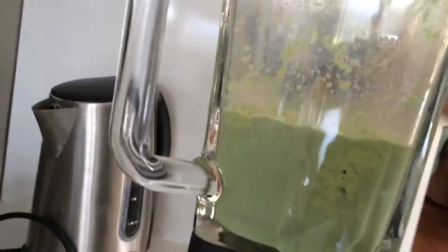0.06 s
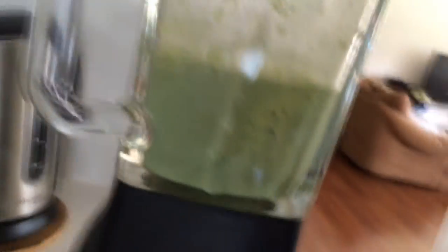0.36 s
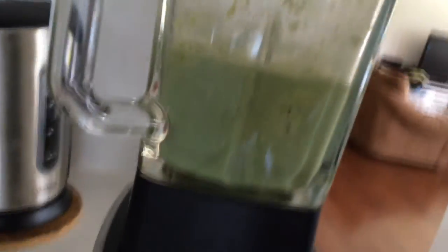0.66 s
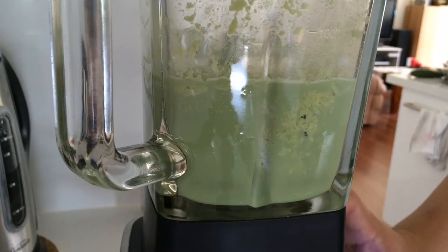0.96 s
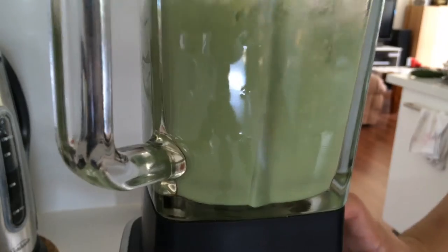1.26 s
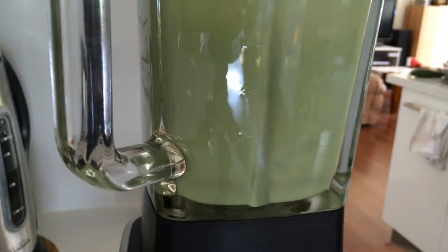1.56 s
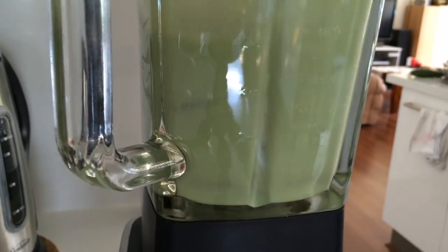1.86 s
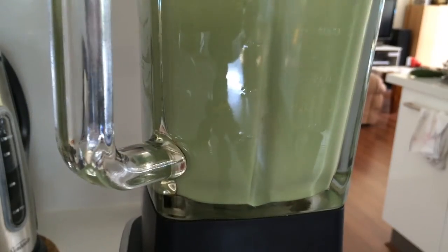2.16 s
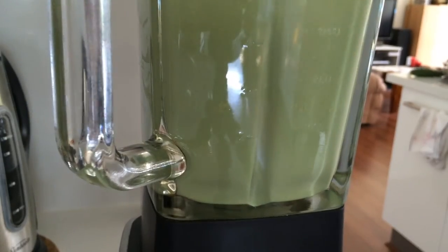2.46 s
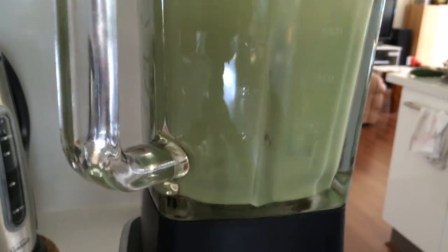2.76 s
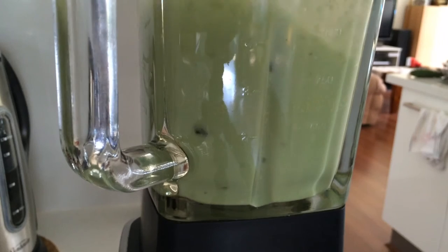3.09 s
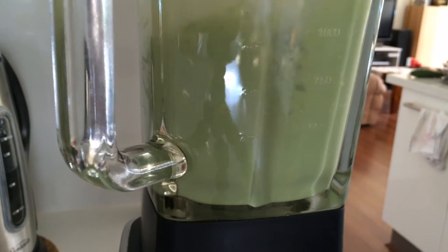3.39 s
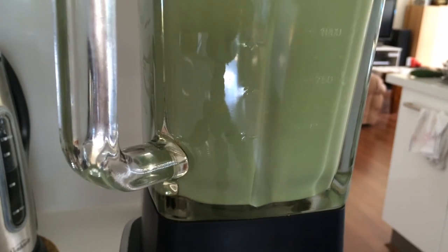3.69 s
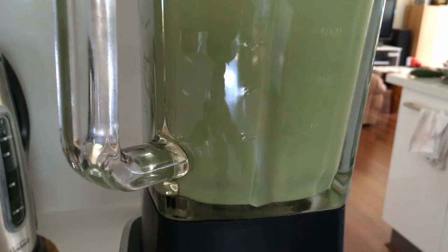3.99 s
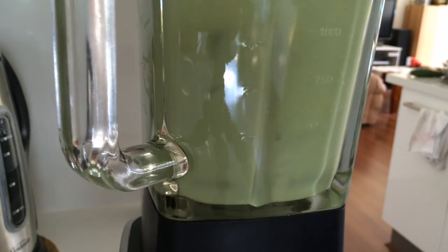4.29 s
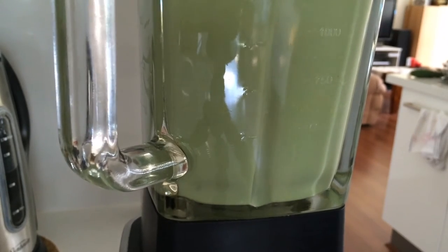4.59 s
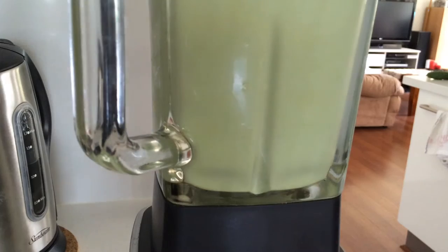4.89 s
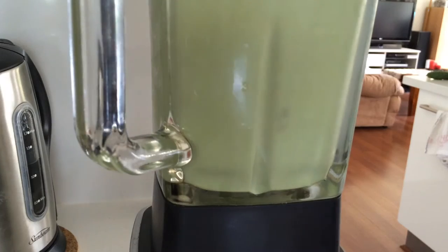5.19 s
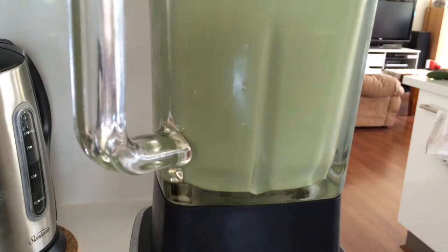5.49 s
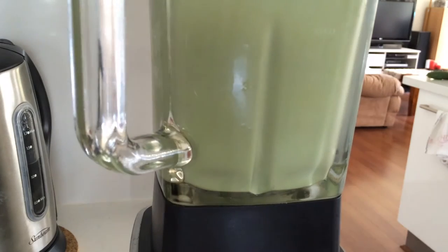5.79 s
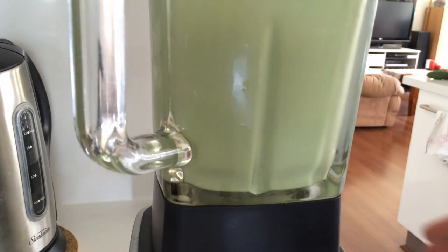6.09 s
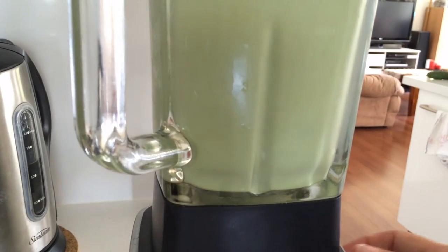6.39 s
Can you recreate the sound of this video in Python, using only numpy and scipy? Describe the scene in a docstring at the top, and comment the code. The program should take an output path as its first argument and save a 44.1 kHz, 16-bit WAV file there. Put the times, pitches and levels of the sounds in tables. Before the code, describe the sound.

After a few soft knocks, a glass blender grinds ice twice, winding down between, then whirs smoothly through the drink.

```python
"""Ice smoothie in a glass blender

Close up in a kitchen: a few handling knocks, the snap of a switch, then two bursts of crushing.
Blades shatter ice against the ringing jar and the base thuds on the counter. The motor's pitch dips
as it crushes and winds down at the end of each burst; the drink slops back between the two. At last
the motor spins freely: a shaft hum, an eight-bladed fan's whine and a rush of air and liquid."""
import sys
import numpy as np
from scipy import signal
from scipy.fft import rfft, irfft, next_fast_len
from scipy.io import wavfile
from scipy.ndimage import uniform_filter1d

SR = 44100
rng = np.random.default_rng(int(sys.argv[2]) if len(sys.argv) > 2 else 0)


def materialize(psi):
    """Save the field psi as 16-bit PCM at rate SR to the path in sys.argv[1].

    A 1-D psi becomes a single channel; in a 2-D psi each row is a channel.
    """
    bounded = np.clip(np.atleast_2d(psi).T, -1, 1)
    quanta = np.round(bounded * 32767).astype(np.int16)
    wavfile.write(sys.argv[1], SR, quanta)


N = 284356
TIME = np.arange(N) / SR
FFT_SIZE = 2 * next_fast_len(N * 3 // 5)
FREQ = np.maximum(np.arange(FFT_SIZE // 2 + 1) * SR / FFT_SIZE, 1)
FAN_BLADES = 8
THUD_LOAD_DB = 12.5  # the base thuds this much harder at full load

# The two bursts of crushing. Each row: start, run-down start and end in seconds, fade in dB per second.
BURSTS = [(1.197, 2.63, 3.36, 80), (3.386, 4.39, 4.781, 20)]
# Resonances of the filled jar and motor base. Each row: frequency in Hz, width in Hz, lift in dB.
JAR_MODES = [(1207, 89, 3), (1560, 52, 4), (2095, 196, 3), (2900, 66, -1.5), (3680, 150, 4), (4053, 183, 5),
             (4397, 67, 5.5), (4760, 73, 5), (5440, 120, 4), (6240, 140, 3), (6850, 180, 3),
             (7180, 120, 4.5), (7720, 170, 1.5), (9550, 110, 4.5)]
# Tone curves. Each row: frequency in Hz, relative level in dB.
CRUNCH_EQ = [(100, -13), (250, -11), (420, 1), (750, -5), (1400, -0.5), (1850, 1), (2300, 3.5), (3200, 0),
             (4500, -1.5), (5600, -5.5), (8000, -9.5), (11000, -12.5), (15500, -24)]  # bright breaking ice
BOOM_EQ = [(400, -21.5), (760, -17), (900, -6), (1030, 3), (1180, -3), (1400, -6.5), (2000, -29)]  # hollow boom of the filled jar
THUD_EQ = [(20, -21), (45, -14), (85, -2), (130, 3), (180, -6.5), (300, -13.5), (700, -41.5), (2000, -72)]  # low thud of the base on the counter
CLACK_EQ = [(300, -9.5), (1100, -5), (1750, 8.5), (2000, 1), (2350, 9.5), (3000, -9.5), (4000, -10.5),
            (4800, -18.5), (15000, -35.5)]  # hard, dry clack


def crushing(speed, crunch_db, fade_db, load, boom_db=-2.0, thud_db=-17):
    """Blades sweep through clumps of ice: shards crackle, the jar booms, the base thuds."""
    tones, angle = burst_motor(speed, crunch_db, load)
    clumps = drift(30)
    sweep = 1 + 0.24 * np.cos(2 * angle)  # two blade tips pass each rib per turn
    shards = grains(per_s=8000, spread_db=2.5) * sweep * from_db(crunch_db + 2.0 * clumps)
    shoves = grains(per_s=1500, spread_db=2.0) * from_db(crunch_db + boom_db + 1.4 * clumps)
    thuds = grains(per_s=700, spread_db=1.0) * from_db(crunch_db + thud_db + THUD_LOAD_DB * load)
    running = sum(gate(start, end, fade=0.0016) for start, _, end, _ in BURSTS) * from_db(fade_db)
    glass = jar(shards, ring_db=-18.0) + rattle(shards, speed, rattle_db=-12.0)
    return (tones + glass + colour(shoves, BOOM_EQ) + colour(thuds, THUD_EQ)) * running


def ice_chunks(speed, load, jolt_db=-15.5):
    """Big pieces shatter in a spray of cracks, knock on the jar and jolt the base, harder under load."""
    # Chunks caught by the blades. Each row: start and chewing time in seconds, crack and boom in dB.
    chunks = [(1.254, 0.1, -15.5, -16), (1.652, 0.035, -21, -27), (1.846, 0.056, -18.5, -20.5),
              (2.004, 0.026, -26, -19.5), (2.081, 0.013, -18, -19.5), (2.115, 0.042, -26.5, -20.5),
              (2.176, 0.012, -23, -26), (2.371, 0.0098, -21, -17.5), (2.423, 0.016, -15.5, -19.5),
              (2.484, 0.012, -18.5, -22.5), (2.532, 0.011, -18.5, -14.5), (2.572, 0.06, -16, -15),
              (2.698, 0.01, -24, -27), (2.733, 0.008, -23.5, -19), (2.796, 0.0078, -29.5, -23.5),
              (2.831, 0.014, -25.5, -25.5), (2.881, 0.012, -19, -27), (3.386, 0.03, -15.5, -14),
              (3.485, 0.041, -15.5, -17), (3.655, 0.017, -19.5, -28), (3.892, 0.0098, -20.5, -25),
              (3.939, 0.016, -22.5, -24), (4.085, 0.014, -20, -16.5), (4.224, 0.06, -16.5, -17.5),
              (4.293, 0.022, -14, -17), (4.381, 0.013, -13, -23), (4.664, 0.014, -13.5, -13.5)]
    times, holds, crack_db, boom_db = np.transpose(chunks)
    cracks = grains(per_s=16000, spread_db=1.5) * blows(times, holds, crack_db, t60=0.03, rise=0.0011)
    knocking = blows(times, holds, boom_db, t60=0.07, rise=0.003)
    jolts = rng.standard_normal(N) * knocking * from_db(jolt_db + THUD_LOAD_DB * load)
    knocks = rng.standard_normal(N) * knocking
    glass = jar(cracks, ring_db=-12.5) + rattle(cracks, speed, rattle_db=-6.5)
    return glass + colour(jolts, THUD_EQ) + colour(knocks, BOOM_EQ)


def jar(cracks, ring_db, t60=0.46):
    """Cracks come straight through the jar wall and leave the glass ringing."""
    # Mode clusters in the glass above the liquid. Each row: frequency in Hz, width in Hz, lift in dB.
    glass_modes = [(1380, 110, 21), (3000, 220, 14), (4420, 200, 19), (4900, 100, 18), (5380, 170, 21),
                   (6380, 200, 21), (6780, 160, 16), (7280, 220, 20), (7800, 170, 20), (8530, 220, 23),
                   (9370, 300, 20)]
    # Overall tilt of the ring. Each row: frequency in Hz, relative level in dB.
    glass_eq = [(300, -11.5), (1200, 14), (4000, 4.5), (9000, -10.5), (15000, -9)]
    ring = colour(rng.standard_normal(N), glass_eq, glass_modes) * dying(0, t60)
    ring = ring[:SR // 2] / np.linalg.norm(ring)
    return colour(cracks, CRUNCH_EQ, JAR_MODES) + from_db(ring_db) * signal.fftconvolve(cracks, ring)[:N]


def rattle(cracks, speed, rattle_db):
    """Fast blades fling ice at the glass; the rattle stops as they slow down."""
    # The wall's narrow, bright band. Each row: frequency in Hz, relative level in dB.
    rattle_eq = [(2500, -22.5), (3700, -6.5), (4250, -3.5), (4700, 4), (5000, -6), (5500, -14), (8000, -39)]
    return from_db(rattle_db) * colour(cracks * (1 - slowness(speed)), rattle_eq)


def drive():
    """Shaft speed, crunch level, run-down fade and load (0-1, high when slow in coarse ice)."""
    # One curve per burst. Each row: time in seconds, shaft turns per second, crunch level in dB.
    first_burst = [(1.2, 114, -24.5), (1.295, 122, -25.5), (1.38, 206, -26.5), (1.54, 259, -26),
                   (1.7, 269, -25), (1.84, 263, -23), (1.89, 243, -22.5), (2.04, 236, -23.5),
                   (2.17, 211, -22.5), (2.25, 238, -28), (2.38, 240, -22.5), (2.54, 148, -25.5),
                   (2.63, 122, -25.5), (2.67, 122, -28.5)]
    second_burst = [(3.39, 119, -20), (3.5, 140, -23), (3.565, 205, -26), (3.636, 256, -24.5),
                    (3.76, 263, -24.5), (3.888, 250.5, -22.5), (3.98, 262.5, -24), (4.08, 257, -24.5),
                    (4.27, 241, -22), (4.39, 250, -25.5), (4.646, 158, -24), (4.77, 144, -26.5)]
    in_second = TIME > BURSTS[0][2]
    speed, crunch_db = np.where(in_second, automation(second_burst), automation(first_burst))
    fades_db = [-rate * np.maximum(TIME - slowing, 0) for _, slowing, _, rate in BURSTS]
    ice_gone_s, thinning_s = 4.45, 0.31
    coarse_ice = np.clip((ice_gone_s - TIME) / thinning_s, 0, 1)
    load = slowness(speed) ** 2 * coarse_ice
    return speed, crunch_db, np.where(in_second, fades_db[1], fades_db[0]), load


def slowness(speed, free_hz=264.5, drop_hz=58.6):
    """Zero at the shaft's free speed, one when it is slower by drop_hz or more."""
    return np.clip((free_hz - speed) / drop_hz, 0, 1)


def burst_motor(speed, crunch_db, load, spin_up_hz_per_s=360, sixth_db=-36.5):
    """At low speed the motor hums more and its whine wavers; the whine runs clean as it speeds up."""
    slow = slowness(speed)
    acceleration = uniform_filter1d(np.gradient(speed) * SR, size=2000)
    gaining = np.clip(acceleration / spin_up_hz_per_s, 0, 1)
    waver = slow * (1 - gaining)
    jitter, flutter_db = 0.004 + 0.02 * waver, 2 + 2.5 * waver
    hum_db = crunch_db - 19 + 11.5 * slow + 4.5 * load
    whine_db = whine_level(speed) - 6.5 * load * (1 - gaining)
    tones, angle = motor(speed, hum_db, whine_db, jitter, flutter_db, overtone_db=-10.5)
    sixth = from_db(sixth_db) * slow * np.sin(6 * angle)  # sings below the whine at low speed
    return tones + sixth, angle


def free_spin(start_s=4.768, hum_db=-40, rush_db=-26, swell_db_per_s=0.76):
    """From about 4.77 s the motor runs fast and even over a fine rush of air and liquid."""
    # Pitch of the fan. Each row: time in seconds, whine in Hz.
    whine_pitch = [(4.79, 2068), (4.918, 2076), (5.116, 2015), (5.182, 2019), (5.208, 2042), (5.398, 2040),
                   (5.434, 2028), (5.706, 2044), (6.076, 2003), (6.242, 2044), (6.302, 2034), (6.448, 2090)]
    # Broad wash of air and liquid. Each row: frequency in Hz, relative level in dB.
    rush_eq = [(40, -29), (120, -1.5), (300, -8), (500, -0.5), (780, -1), (1050, 5), (1400, 1.5),
               (2200, 4.5), (2700, 2.5), (4100, -3.5), (5000, -5), (7000, -8.5), (10000, -11), (15500, -18)]
    speed = automation(whine_pitch)[0] / FAN_BLADES
    tones, _ = motor(speed, hum_db, whine_level(speed), jitter=0.00088, flutter_db=1.1, overtone_db=3.0)
    swell_db = swell_db_per_s * (TIME - start_s)
    rush = grains(per_s=22000, spread_db=0.5) * from_db(rush_db + swell_db + drift(60))
    return (tones + colour(rush, rush_eq, JAR_MODES)) * gate(start_s, np.inf, fade=0.035)


def motor(speed, hum_db, whine_db, jitter, flutter_db, overtone_db):
    """Imbalance hums once a turn, the fan whines once a blade; returns the sound and the shaft angle."""
    # Shaft overtones. Each row: multiple of the shaft speed, level in dB from hum_db + overtone_db.
    orders = [(2, -7), (3, -15), (4, -2), (9, -14), (10, -12), (16, -11)]
    angle = 2 * np.pi * np.cumsum(speed * (1 + jitter * drift(47.6))) / SR
    whine = from_db(whine_db + flutter_db * drift(45)) * np.sin(FAN_BLADES * angle)
    hum = from_db(hum_db) * np.sin(angle)
    overtones = sum(from_db(db + flutter_db * drift(24)) * np.sin(k * angle) for k, db in orders)
    return np.sqrt(2) * (whine + hum + from_db(hum_db + overtone_db) * overtones), angle


def whine_level(speed, floor_db=-37.5):
    """Fan level in dB: it swells where the blade rate meets a resonance of the housing."""
    # Housing resonances. Each row: frequency in Hz, width in Hz, peak level in dB.
    housing_modes = [(1156, 84, -20), (1678, 59, -22), (2095, 81, -17.5)]
    blade_hz = FAN_BLADES * speed
    swell = sum(from_db(db) ** 2 * bell(blade_hz, hz, width) for hz, width, db in housing_modes)
    return 10 * np.log10(from_db(floor_db) ** 2 + swell)


def starting_growl(mains_hz=50, t60=0.25):
    """Until the shaft is up to speed its torque throbs at twice the mains rate."""
    # Surges of current as the motor starts. Each row: start in seconds, level in dB.
    surges = [(1.203, -26), (3.385, -16.5)]
    return low_pulses(surges, 2 * mains_hz, t60)


def power_switch(start_s=1.198, level_db=-19.5, t60=0.092):
    """The switch snaps over, short and hard, in the motor base."""
    return colour(from_db(level_db) * dying(start_s, t60) * rng.standard_normal(N), CLACK_EQ)


def settling(splash_db=-9.5):
    """As the blades stop, the drink slops back with a thump and a splash, and ice ticks on the glass."""
    # Slops of the drink. Each row: start in seconds, thump level in dB.
    slop_hits = [(2.84, -26.5), (3.045, -42), (3.2, -39)]
    # Last bits of ice tumbling. Each row: start in seconds, tick level in dB.
    tumbles = [(2.983, -37), (3.047, -45), (3.177, -46), (3.317, -57), (3.359, -48)]
    slops = sum(from_db(db) * dying(s, t60=0.32, rise=0.016) for s, db in slop_hits)
    ticks = sum(from_db(db) * dying(s, t60=0.074, rise=0.0041) for s, db in tumbles)
    patter = grains(per_s=4100, spread_db=2.0) * (from_db(splash_db) * slops + ticks)
    return colour(rng.standard_normal(N) * slops, THUD_EQ) + colour(patter, CRUNCH_EQ, JAR_MODES)


def handling(slide_from_s=0.604, slide_to_s=0.72, slide_db=-69, counter_hz=85):
    """Soft bumps with a brighter clack, a light slide and a few low nudges of a hand on the counter."""
    # Handling knocks. Each row: start in seconds, bump in dB, clack in dB, decay time in seconds.
    hits = [(0.314, -24.5, -48, 0.044), (0.389, -38, -70, 0.069), (0.416, -40.5, -78, 0.1),
            (0.687, -50, -65, 0.066), (0.716, -42.5, -45, 0.072), (0.731, -48.5, -45.5, 0.11),
            (0.801, -57, -54, 0.076), (0.833, -49.5, -52.5, 0.067)]
    # The hand on the counter. Each row: start in seconds, level in dB.
    nudges = [(0.803, -37.5), (0.969, -43), (1.068, -42)]
    # A dull bump and a thin scrape. Each row: frequency in Hz, relative level in dB.
    bump_eq = [(60, -7), (180, 0), (350, 0.5), (700, 1.5), (1000, -14.5), (1500, -12), (2500, -36),
               (8000, -40)]
    scrape_eq = [(1200, -20), (2400, 4), (3300, 2), (4200, -11), (7000, -26)]
    bumps = sum(from_db(db) * dying(s, t60) for s, db, _, t60 in hits)
    clacks = sum(from_db(db) * dying(s, t60) for s, _, db, t60 in hits)
    sliding = from_db(slide_db) * gate(slide_from_s, slide_to_s, fade=0.02)
    slide = colour(sliding * grains(per_s=5000, spread_db=4.0), scrape_eq)
    knocks = colour(bumps * rng.standard_normal(N), bump_eq)
    knocks += colour(clacks * rng.standard_normal(N), CLACK_EQ)
    return knocks + slide + low_pulses(nudges, counter_hz, t60=0.29)


def kitchen(x, t60=0.26, wet_db=-17.0):
    """Walls and cupboards return a short diffuse tail."""
    t = TIME[:SR // 2]
    tail = rng.standard_normal(len(t)) * from_db(-60 * t / t60) * (t > 0.004)
    return x + from_db(wet_db) * signal.fftconvolve(x, tail / np.linalg.norm(tail))[:N]


def room_tone(level_db=-55):
    """A faint, steady bed of low noise."""
    # The quiet kitchen. Each row: frequency in Hz, relative level in dB.
    room_eq = [(25, -18), (55, -8), (90, 3), (150, -13.5), (260, -21), (500, -16.5), (1000, -23),
               (2000, -32.5), (4000, -38), (6000, -39.5), (9000, -44.5), (15000, -52)]
    return from_db(level_db) * colour(rng.standard_normal(N), room_eq)


def from_db(db):
    """Decibels to gain."""
    return 10 ** (np.asarray(db) / 20)


def rms_one(x):
    """Scale to an rms of one."""
    return x / np.sqrt(np.mean(x ** 2) + 1e-20)


def automation(rows):
    """Breakpoints, time first, to one curve per remaining column."""
    times, *columns = np.transpose(rows)
    return [np.interp(TIME, times, column) for column in columns]


def drift(rate_hz):
    """Smooth random wander, mostly slower than rate_hz; rms 1."""
    return rms_one(irfft(rfft(rng.standard_normal(FFT_SIZE)) / (1 + (FREQ / rate_hz) ** 2))[:N])


def bell(hz, centre, width):
    """A resonance peak: one at the centre, a half at half a width away."""
    return 1 / (1 + (2 * (hz - centre) / width) ** 2)


def colour(x, eq, modes=()):
    """Filter by a tone curve and resonances; white input keeps its power."""
    points_hz, points_db = np.transpose(eq)
    curve_db = np.interp(np.log(FREQ), np.log(points_hz), points_db)
    curve_db += sum(lift * bell(FREQ, hz, width) for hz, width, lift in modes)
    cepstrum = irfft(np.log(rms_one(from_db(curve_db))))
    cepstrum[1:FFT_SIZE // 2] *= 2  # fold to minimum phase: nothing rings ahead of a hit
    cepstrum[FFT_SIZE // 2 + 1:] = 0
    return irfft(rfft(x, FFT_SIZE) * np.exp(rfft(cepstrum)))[:N]


def grains(per_s, spread_db):
    """Random tiny impacts, many weak and a few strong; rms 1."""
    sizes = from_db(spread_db * np.minimum(rng.exponential(1, N), 4)) * rng.choice([-1, 1], N)
    return rms_one(sizes * (rng.random(N) < per_s / SR))


def dying(start, t60, rise=0.00047):
    """Envelope of a blow that builds quickly and dies away."""
    age = TIME - start
    return np.clip(age / rise, 0, 1) * from_db(-60 * np.clip(age / t60, 0, 2))


def low_pulses(hits, hz, t60):
    """A dying sine for each hit."""
    return sum(from_db(db) * dying(s, t60) * np.sin(2 * np.pi * hz * (TIME - s)) for s, db in hits)


def blows(times, holds, levels_db, t60, rise, sag_db=5.0):
    """Envelope of a series of blows: each builds quickly, sags while it is chewed, then dies away."""
    age, envelope = TIME[:SR // 2], np.zeros(N + SR)
    for s, hold, db in zip(times, holds, levels_db):
        loss_db = sag_db * np.minimum(age / hold, 1) + 60 * np.maximum(age - hold, 0) / t60
        envelope[round(s * SR):][:len(age)] += np.minimum(age / rise, 1) * from_db(db - loss_db)
    return envelope[:N]


def gate(start, stop, fade):
    """Open from start to stop, with a linear fade at each edge."""
    return np.clip((TIME - start) / fade, 0, 1) * np.clip((stop - TIME) / fade, 0, 1)


def scene():
    """A mono mix on both channels: crushing, settling, handling and switch get the kitchen's tail."""
    speed, crunch_db, fade_db, load = drive()
    ice = crushing(speed, crunch_db, fade_db, load) + ice_chunks(speed, load) + settling()
    bed = room_tone()
    mono = kitchen(ice + handling() + power_switch()) + starting_growl() + free_spin() + bed
    return np.array([mono, mono])


def record(dry, ceiling=0.76, cutoff_hz=15600):
    """Soft saturation rounds the peaks and a steep low-pass cuts the top."""
    lowpass = signal.ellip(12, 0.1, 80, cutoff_hz, fs=SR, output="sos")
    return signal.sosfilt(lowpass, ceiling * np.tanh(dry / ceiling))


dry = scene()
out = record(dry)
materialize(out)
```